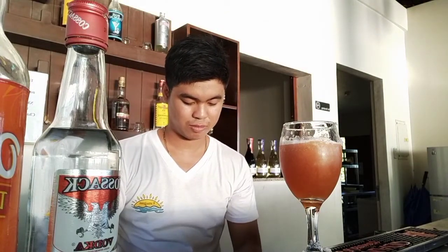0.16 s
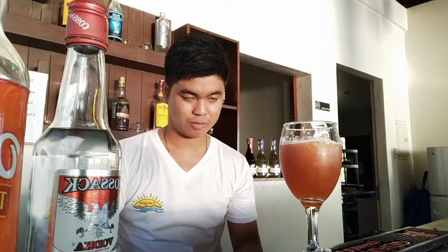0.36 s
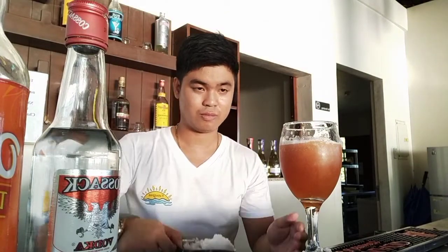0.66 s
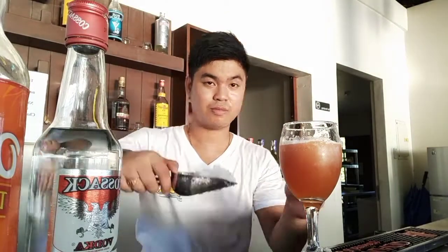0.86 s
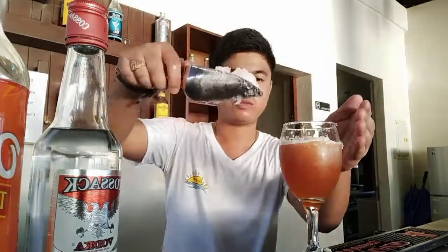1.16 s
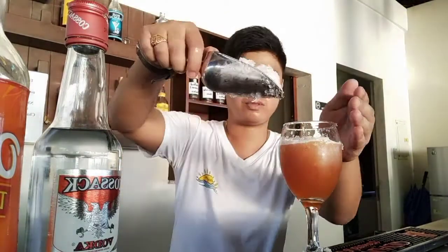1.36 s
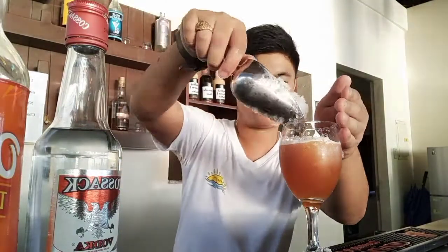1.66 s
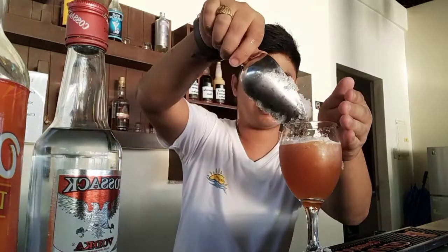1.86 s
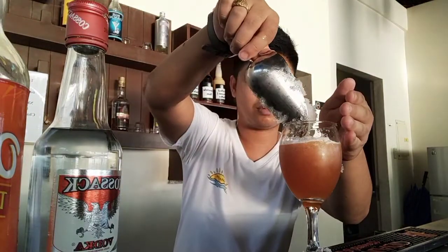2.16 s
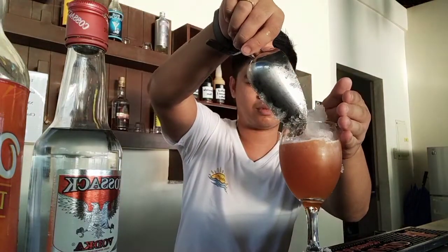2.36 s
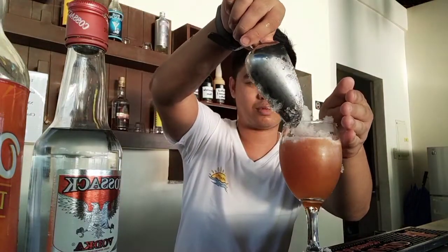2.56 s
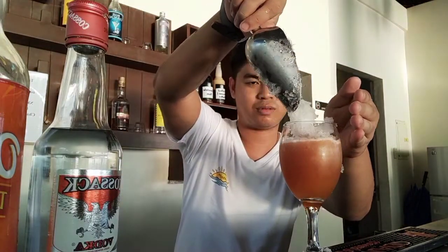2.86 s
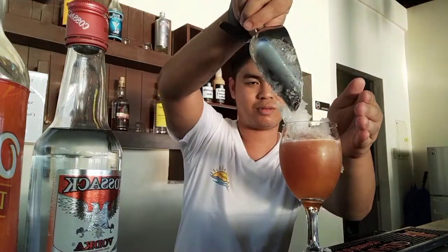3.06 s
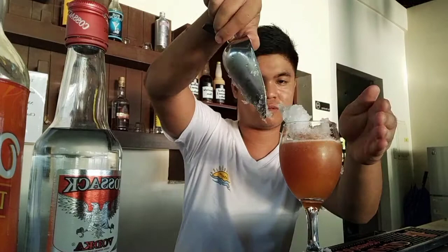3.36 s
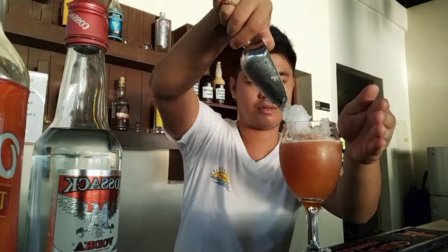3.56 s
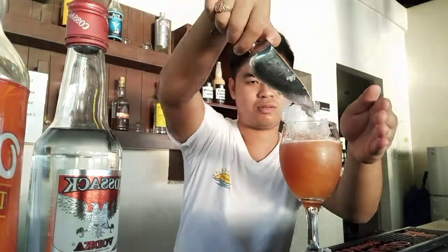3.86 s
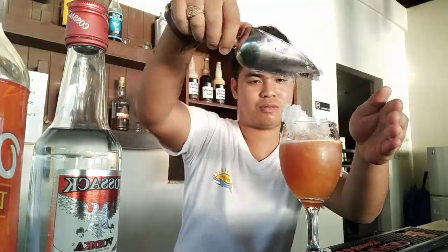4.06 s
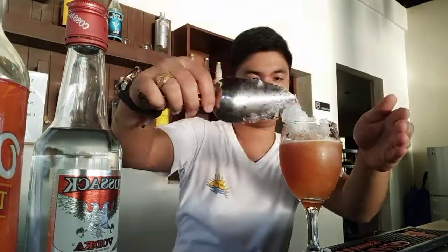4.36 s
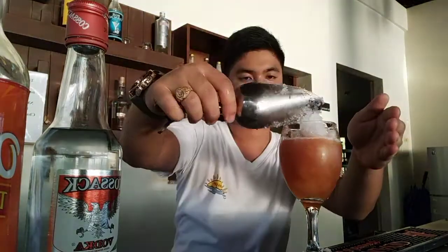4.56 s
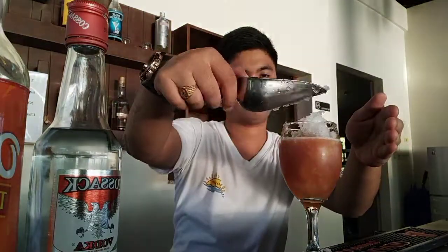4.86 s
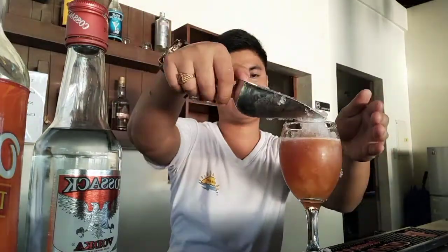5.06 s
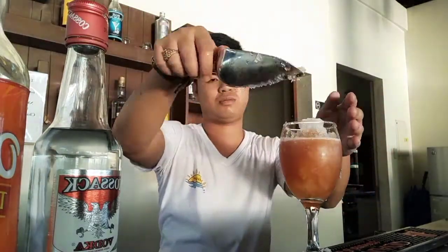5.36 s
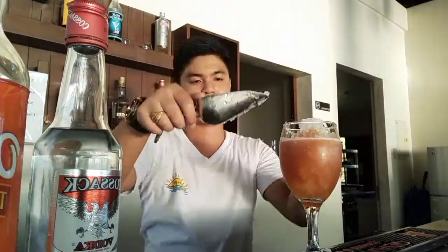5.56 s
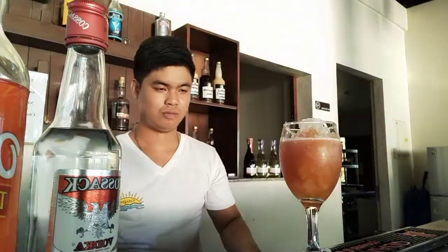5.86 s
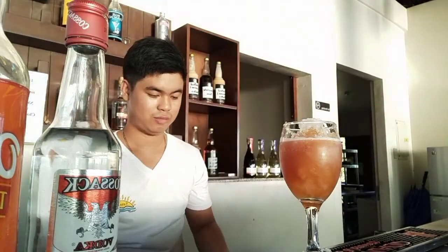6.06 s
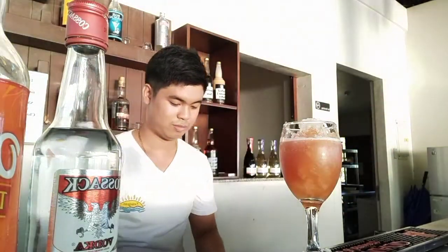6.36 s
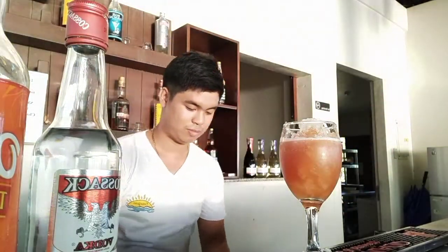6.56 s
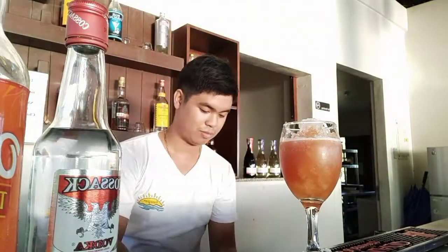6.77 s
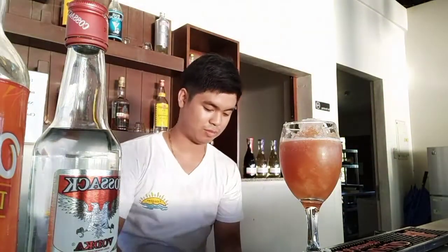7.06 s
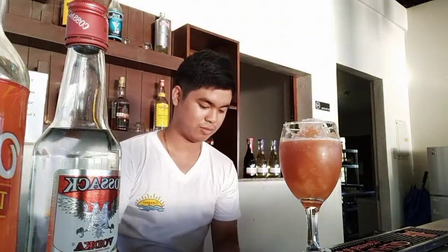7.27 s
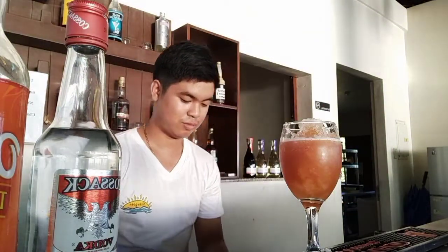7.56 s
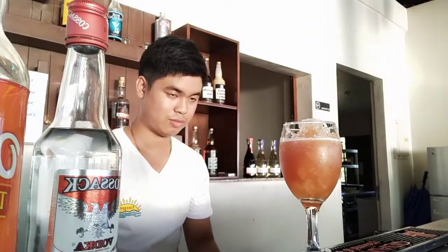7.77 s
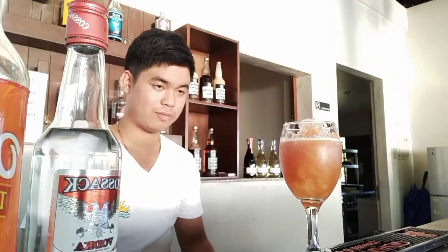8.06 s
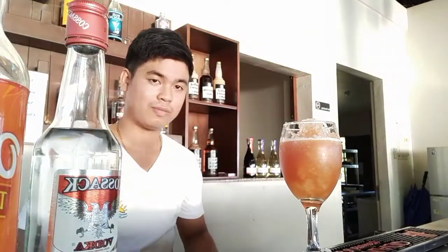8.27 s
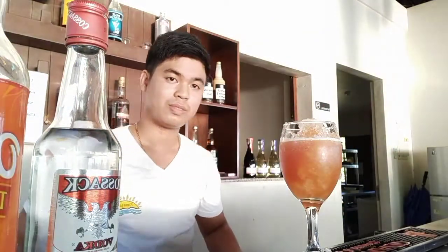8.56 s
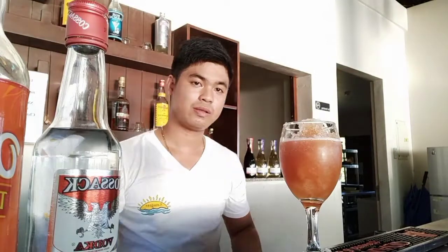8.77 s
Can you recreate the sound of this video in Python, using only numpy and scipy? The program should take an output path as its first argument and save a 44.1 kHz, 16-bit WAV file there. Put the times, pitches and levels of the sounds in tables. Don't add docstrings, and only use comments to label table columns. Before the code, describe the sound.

In a hard, ringing bar room with a low fridge rumble, spaced heavy blows crack ice and ring steel, scattering tiny glassy ticks. After a lull, a metal scoop digs into crushed ice in short gritty crunches with clacking lumps. It ends with a clink on the counter. One microphone sits a few metres away.

```python
import sys
import numpy as np
from scipy import signal
from scipy.io import wavfile
from scipy.ndimage import uniform_filter1d

SR = 44100
rng = np.random.default_rng(int(sys.argv[2]) if len(sys.argv) > 2 else 0)


def convert_level_to_amplitude(level_db):
    exponent = np.asarray(level_db, float) / 20
    return 10 ** exponent


def inscribe(sig):
    pcm = np.round(np.clip(np.atleast_2d(sig).T, -1, 1) * 32767)
    wavfile.write(sys.argv[1], SR, pcm.astype(np.int16))


N = 392490

# frequency in Hz, density in dB per Hz.
RUMBLE_COLOUR = [(15, -14), (25, -9.5), (53, 2), (103, -1.5), (197, -14), (259, -14.5), (524, -19.5),
                 (1180, -19.5), (1930, -23), (2600, -24.5), (5880, -40), (8370, -35), (11300, -42),
                 (15200, -37.5)]
RUMBLE_DB = -50.5
# time in seconds, level in dB.
RUMBLE_SWELL = [(0, -4), (.9, -0.5), (1.5, -1), (1.76, 2.5), (2.03, -1), (2.45, 2), (3.05, -1), (3.7, -0.5),
                (4.2, 2), (4.85, 4), (5.13, -1), (5.8, -3), (6.9, 1), (7.8, -1), (8.9, -3.5)]
WASH_FOLLOWS = 0.77
# frequency in Hz, width in Hz, level in dB.
FRIDGE_HUM = [(53.3, 30, -62.5), (110.6, 25, -62.5), (192, 66, -70.5)]

# frequency in Hz, t60 in seconds.
ROOM_DECAY = [(100, 0.9), (250, 0.48), (500, 0.45), (1000, 0.32), (2700, 0.42), (5000, 0.36),
              (10000, 0.31475), (16000, 0.31)]
# delay after the air path in seconds, level in dB.
REFLECTIONS = [(0, -6), (.0022, -2), (.0042, 0), (.0062, 3), (.0078, 2), (.011, -4), (.0155, -7),
               (.026, -5), (.029, -2)]

# start in seconds, level of the first 40 ms in dB, thud in dB,
# low steel ring in dB, high steel ring in dB.
BLOWS = [
    (.179, -30.5, 2, -6, -28),
    (.813, -26, 1, -11, 3.5),
    (1.611, -26, 3, -13, 5),
    (2.2134, -34, -11, -20, 1),
    (2.2549, -28, 9, -33, -3),
    (3.836, -27, 3.5, -1.5, -1),
    (4.299, -25, 1, 2.5, -28),
    (4.7089, -23.5, -1, 0.5, -21),
]
# frequency in Hz, density in dB per Hz.
CRACK_COLOUR = [(35, -44), (60, -8.5), (546, -8), (742, -6.5), (1110, -2.5), (1270, 1), (2190, -6),
                (2580, -4), (3930, -13), (5100, -16.5), (5600, -24), (8150, -14), (11900, -22),
                (15400, -20), (16500, -21.5)]
# frequency in Hz, level in dB, t60 in seconds.
LOW_RING = [(2530, -31.5, 0.19), (2620, -5, 0.29), (2520, -9, 0.64), (2597, 2.5, 0.52), (2550, 12, 0.49),
            (2743, 26, 0.04), (2860, 17, 0.2064), (2804, 13, 0.17)]
HIGH_RING = [(4942, 0, .34), (5200, -10, .2), (8060, 0, .25), (8300, -6, .22)]
# frequency in Hz, level in dB, t60 in seconds.
BLOCK_KNOCK = [(897, -6, 0.13), (1162, 14, 0.01469), (1540, -9.5, 0.02249)]
# delay in seconds, level in dB.
COUNTER_ARRIVALS = [(.000, -2.5), (.005, -3)]
# frequency in Hz, density in dB per Hz.
COUNTER_COLOUR = [(60, -20.5), (300, -5.5), (800, 1.5), (1600, -8), (4000, -32.0), (9000, -37.5)]
AIR_LAG_S = .0095
CLAP_HZ, CLAP_WIDTH_HZ, CLAP_DB = 1294, 444, -7
SPLASH_DB, FIRM_DB, SPLASH_SLOPE = 1.4, -29.5, 4.5

# start in seconds, peak in dB, pitch in Hz, broad tick in dB.
CHIPS = [(1.1116, -49, 10100, -9), (1.578, -21.5, 6374, 14.5), (1.9054, -38, 16200, -40),
         (2.6254, -51.5, 14400, 3), (2.727, -54, 6300, 4), (2.7786, -52, 6230, 7),
         (2.9135, -47.5, 9050, 12), (2.935, -48.5, 9785, 9), (3.2294, -64, 5310, -6),
         (4.9943, -45, 15000, -1), (7.6894, -59.5, 6950, -3), (8.3882, -60, 13670, -1)]
# frequency in Hz, density in dB per Hz.
CHIP_COLOUR = [(400, -9), (1800, 4), (5500, -5), (8300, -3), (11500, -4), (15000, -6)]

# start in seconds, push in seconds, crunch on entry in dB,
# crunch at the end of the push in dB, hiss of fine ice in dB.
STROKES = [(1.3, 0.029, -50, -54.5, -68), (6.11, 0.0935, -68.5, -65, -69.5),
           (6.339, 0.089, -65.5, -65, -67.5), (6.494, 0.02722, -50, -50.5, -57),
           (6.67, 0.16, -54, -48, -57), (7.003, .06, -46, -40.5, -51.5), (7.082, 0.027, -40, -33, -51),
           (7.3, 0.15, -53.5, -49.5, -56), (7.617, 0.096, -56, -46, -60), (7.861, 0.033, -70, -46, -61),
           (7.89, 0.088, -39, -51, -55), (8.762, .085, -49.5, -65, -64)]
# frequency in Hz, density in dB per Hz.
CRUNCH_COLOUR = [(88, -22), (150, 2), (187, 5.5), (317, -11), (605, -6.5), (660, -8), (1760, -3.5),
                 (2580, -0.5), (5000, -74), (6500, -57), (11000, -120)]
HISS_COLOUR = [(2060, -4), (3500, 4.5), (4470, -0.5), (4950, 0), (6310, 0.5), (6730, -6), (8370, 5),
               (11800, -5), (15000, 5), (16200, 4)]
BITE_S, SETTLE_S = 0.01, .14
CRUNCH_FALL, HISS_FALL = 450, 210
EMPTY_HZ, FULL_HZ = 1030, 1750

# start in seconds, length in seconds, pitch in Hz, glide in Hz, level in dB.
WHISTLES = [
    (2.998, .27, 4800, 1150, -71.5),
    (3.042, .26, 5350, -20, -73.5),
    (5.45, 0.36, 1087, 110, -66),
    (8.293, 0.12985, 3910, -20, -70),
    (8.33, 0.2348, 1097, 48, -66),
]

# start in seconds, peak in dB, low pitch in Hz, high pitch in Hz,
# treble in dB.
KNOCKS = [(5.353, -45.5, 1340, 1730, -31.5), (5.396, -49, 1490, 2280, -24), (5.669, -50.5, 1184, 2300, -16),
          (6.501, -39, 831.3, 2680, -19), (6.671, -43, 1490, 1550, -12), (6.711, -29, 680, 1800, -13),
          (6.799, -39.5, 1440, 2080, -10), (7.006, -33, 1112, 1520, -12), (7.036, -24.5, 790, 2220, -44),
          (7.047, -36, 910, 2039, -20), (7.084, -29.5, 1520, 2670, -17.5), (7.099, -35, 1368, 1830, -22),
          (7.301, -43, 1460, 1590, -7), (7.373, -35.5, 875, 2020, -21), (7.625, -35.5, 1365, 1440, 5),
          (7.649, -31, 900, 1402, -33), (7.678, -30.5, 1160, 1670, -24), (7.698, -38, 1248, 1588, -23),
          (7.895, -21, 720, 2500, -21), (7.909, -41, 625, 2750, -7), (7.96, -31, 1440, 1750, -33)]
THUMP_DB, THUMP_SLOPE = -11.5, 12

# time in seconds, rate in Hz.
SLIP_RATE = [(8.17, 2640), (8.185, 2740), (8.21, 2825), (8.285, 2885), (8.33, 2860), (8.35, 2720)]
# multiple of the slip rate, start in seconds, length in seconds, level in dB.
SLIP_PARTIALS = [(5, 8.172, 0.1655, -66), (4, 8.175, .17, -86), (5.39, 8.2, .082, -69),
                 (5.33, 8.295, 0.0619, -67), (4.69, 8.268, 0.075, -67)]
ARCH_MID_S, ARCH_HALF_S, ARCH_TOP_HZ, ARCH_BEND, ARCH_DB = 8.262, .15, 18000, 225000, -77

# start in seconds, peak in dB, pitch share.
CLINK = [
    (8.613, -22.5, 1),
]
# frequency in Hz, level in dB, t60 in seconds.
SCOOP_MODES = [(662, -9.5, 0.2072), (1210, -27, .12), (1440, -3, .25), (1520, 3.5, 0.11), (1800, -7, 0.057),
               (2660, -5.5, 0.2), (4210, -19, 0.2003), (5197.6, -11, 0.14), (6270, -13, 0.0775),
               (6970, -13, .14), (8560, -11, .2), (8900, -6, 0.16), (9050, -10, 0.06), (10400, -16, .1),
               (11720, -13, .12), (12841, -10, .13), (14600, -9, .17), (14850, -16, .08)]
# start in seconds, peak in dB, pitch share.
NUDGES = [
    (8.767, -40, .92),
    (8.816, -37, 1.0),
]
# frequency in Hz, level in dB, t60 in seconds.
TUB_MODES = [(602, -3.5, 0.51), (856, -2, 0.41), (1467.6, -24, 5.0), (1606, 3, 0.13), (1682, -23.5, 0.14),
             (1965, -7, 0.21), (2350, -25.5, 0.23)]
GRIP_S, GRIP_FALL = 0.075, 600


def evened(x):
    return x / np.sqrt(np.mean(x ** 2) + 1e-20)


def peaked(x, db):
    return convert_level_to_amplitude(db) * x / np.max(abs(x))


def add(mix, s, sound):
    part = mix[round(s * SR):][:len(sound)]
    part += sound[:len(part)]


def read(points, hz):
    f, value = np.transpose(points)
    return np.interp(np.log(hz + 1), np.log(f + 1), value)


def coloured(x, *spectra, size=4096):
    hz = abs(np.fft.fftfreq(size, 1 / SR))
    log_gain = np.log(convert_level_to_amplitude(sum(read(s, hz) for s in spectra)))
    response = np.exp(np.conj(signal.hilbert(log_gain)))
    impulse = np.fft.ifft(response).real[:size // 2]
    return signal.oaconvolve(x, impulse)[:len(x)]


def resonate(x, hz, width_hz):
    turn = np.exp(2j * np.pi * np.cumsum(hz * np.ones(len(x))) / SR)
    r = np.exp(-np.pi * width_hz / SR)
    return 2 * (turn * signal.lfilter([1 - r], [1, -r], x / turn)).real


def ring(modes, longest, size=20000):
    t = np.arange(size) / SR
    split = rng.uniform(0.0012, 0.00676, len(modes))
    out = np.zeros(size)
    for (hz, db, t60), d in zip(modes, split):
        pair = np.sin(2 * np.pi * hz * t) + np.sin(2 * np.pi * hz * (1 + d) * t)
        out += convert_level_to_amplitude(db - 60 * t / min(t60, longest)) * pair
    return out


def crack(t60, size=26000):
    snaps = rng.choice([-1., 1.], size) * convert_level_to_amplitude(3.43 * np.minimum(rng.exponential(1, size), 3))
    return snaps * convert_level_to_amplitude(-60 * np.arange(size) / SR / t60)


def contact(crumble_db, t60, size):
    hit = convert_level_to_amplitude(crumble_db) * crack(t60, size)
    hit[0] = 1
    return hit


def with_room(sound, room_db, space):
    return sound + convert_level_to_amplitude(room_db) * signal.fftconvolve(sound, space)[:len(sound)]


def room(diffuse_db=4, rise=0.0038):
    taps = np.zeros(SR)
    at = np.arange(0, SR - 10, 10)
    taps[at + rng.integers(0, 10, len(at))] = rng.choice([-1., 1.], len(at))
    hz, t, z = signal.stft(taps, SR, nperseg=512)
    decay = convert_level_to_amplitude(-60 * t / read(ROOM_DECAY, hz)[:, None])
    tail = signal.istft(z * decay, SR, nperseg=512)[1][:SR]
    tail *= 1 - np.exp(-np.arange(SR) / SR / rise)
    tail *= convert_level_to_amplitude(diffuse_db) * 2 / np.linalg.norm(tail)
    for s, db in REFLECTIONS:
        scatter = crack(0.0075, size=200)
        add(tail, s, convert_level_to_amplitude(db) * scatter / np.linalg.norm(scatter))
    return tail / np.linalg.norm(tail)


def background():
    frames, hz = N // 512 + 5, np.fft.rfftfreq(2048, 1 / SR)
    a, b, patches = rng.standard_normal((frames, 1025, 3)).T
    patches = evened(uniform_filter1d(uniform_filter1d(patches, 16, 0), 6, 1))
    t = np.arange(frames) * 512 / SR
    low = 1 / (1 + (hz[:, None] / 250) ** 4)
    swell_db = (low + (1 - low) * WASH_FOLLOWS) * np.interp(t, *np.transpose(RUMBLE_SWELL))
    z = (a + 1j * b) * convert_level_to_amplitude(read(RUMBLE_COLOUR, hz)[:, None] + 1.87 * patches + swell_db)
    wash = signal.istft(z, nperseg=2048, noverlap=1536)[1][:N]
    out = convert_level_to_amplitude(RUMBLE_DB - 4.0) * evened(wash)
    for f, width_hz, db in FRIDGE_HUM:
        flutter = evened(resonate(rng.standard_normal(N), 0, width_hz))
        level = resonate(np.sqrt(2) + 0.4 * flutter + 0j, 0, 200) / 2
        drift = evened(resonate(rng.standard_normal(N), 0, 3.98))
        out += convert_level_to_amplitude(db) * level * np.sin(2 * np.pi * np.cumsum(f * (1 + 0.02565 * drift)) / SR)
    return out


def blows(space):
    out = np.zeros(N)
    for s, db, thud_db, low_db, high_db in BLOWS:
        splash_db = SPLASH_DB + SPLASH_SLOPE * min(db - FIRM_DB, 0)
        hit = contact(-31.0, 0.02883, 20000)
        tone = [(70, thud_db - 9), (150, thud_db - 2.5), (300, thud_db - 6), (550, thud_db - 3.5),
                (1000, 0.0089), (3000, 0), (4800, -thud_db / 2), (7000, splash_db / 2),
                (10000, splash_db), (14000, splash_db / 2)]
        ice = evened(coloured(hit, CRACK_COLOUR, tone)) + convert_level_to_amplitude(-14) * evened(ring(BLOCK_KNOCK, 0.21))
        steel = convert_level_to_amplitude(low_db - 10.5) * evened(ring(LOW_RING, 0.8))
        steel += convert_level_to_amplitude(high_db - 21.5) * evened(ring(HIGH_RING, .4))
        heard = signal.fftconvolve(ice + steel, space)
        heard /= np.std(heard[:SR // 25])
        hollow = resonate(hit[:400], CLAP_HZ, CLAP_WIDTH_HZ)
        hollow = resonate(hollow, CLAP_HZ, CLAP_WIDTH_HZ)
        clap = signal.fftconvolve(hollow, space[:420])
        heard[:len(clap)] += convert_level_to_amplitude(CLAP_DB) * evened(clap)
        add(out, s + .0007, convert_level_to_amplitude(db) * heard)
        push = coloured(crack(0.023, size=1500), COUNTER_COLOUR)
        for lag, ahead_db in COUNTER_ARRIVALS:
            push_db = db + ahead_db + 0.94 * min(thud_db, 0)
            add(out, s + 0.00063 - AIR_LAG_S + lag, peaked(push, push_db))
    return out


def chips(space):
    out = np.zeros(N)
    for s, db, hz, tick_db in CHIPS:
        snap = crack(0.014, size=6000)
        chip = evened(resonate(snap, hz, 250)) + convert_level_to_amplitude(tick_db) * evened(coloured(snap, CHIP_COLOUR))
        add(out, s, peaked(with_room(chip, -9.0, space), db))
    return out


def strokes(space):
    out = np.zeros(N)
    for start, push, entry_db, end_db, hiss_db in STROKES:
        t = np.arange(0, push + SETTLE_S, 1 / SR)
        done, after, bite = np.minimum(t / push, 1), np.maximum(t - push, 0), np.minimum(t / BITE_S, 1)
        grains = rng.standard_normal((2, len(t)))
        big, fine = grains * convert_level_to_amplitude(4.7 * np.minimum(rng.exponential(1, (2, len(t))), 3.5))
        big *= rng.random(len(t)) < 6000 / SR
        hollow = resonate(big, EMPTY_HZ + (FULL_HZ - EMPTY_HZ) * done ** 2, 210)
        crunch = evened(evened(coloured(big, CRUNCH_COLOUR)) + convert_level_to_amplitude(-9.5) * evened(hollow))
        crunch *= convert_level_to_amplitude(entry_db + (end_db - entry_db) * done - CRUNCH_FALL * after - 4.5)
        waver = evened(uniform_filter1d(rng.standard_normal(len(t)), size=500))
        hiss = evened(coloured(fine, HISS_COLOUR)) * convert_level_to_amplitude(hiss_db - HISS_FALL * after + 1.8 * waver)
        add(out, start, (crunch + hiss) * bite)
    return with_room(out, -11, space)


def whistles():
    out = np.zeros(N)
    for start, length, hz, glide_hz, db in WHISTLES:
        u = np.arange(0, length, 1 / SR) / length
        air = rng.standard_normal(len(u))
        for _ in range(2):
            air = resonate(air, hz + glide_hz * np.sin(1.9 * u), .025 * hz + .6 * abs(glide_hz))
        add(out, start, evened(air) * convert_level_to_amplitude(db - 8.7 * u) * signal.windows.tukey(len(u), .3))
    return out


def knocks(space):
    out = np.zeros(N)
    for s, db, low_hz, high_hz, treble_db in KNOCKS:
        thump_db = THUMP_DB - THUMP_SLOPE * np.log2(low_hz / 1000)
        tone = [(60, thump_db - 12.5), (200, thump_db), (500, 1.25), (3200, -1.2),
                (5500, treble_db - 37), (8300, treble_db), (15000, treble_db - 3)]
        hit = contact(-25, 0.06, 4000)
        clack = evened(resonate(hit, low_hz, 115))
        clack += convert_level_to_amplitude(-4.5) * evened(resonate(hit, high_hz, 94.3))
        clack += convert_level_to_amplitude(thump_db - 10) * evened(resonate(hit, 342, 130))
        lump = np.pad(evened(coloured(hit, tone)) + convert_level_to_amplitude(6) * clack, (0, 16000))
        add(out, s, peaked(with_room(lump, -3, space), db))
    return out


def slip(hz, db):
    waver, catch = (evened(uniform_filter1d(rng.standard_normal(len(hz)), size=k)) for k in (150, 600))
    tone = np.sqrt(2) * np.sin(2 * np.pi * np.cumsum(hz * (1 + .003 * waver)) / SR)
    return tone * convert_level_to_amplitude(db + 3.47 * catch) * signal.windows.tukey(len(hz), .25)


def squeaks():
    out = np.zeros(N)
    for multiple, start, length, db in SLIP_PARTIALS:
        rate = np.interp(start + np.arange(0, length, 1 / SR), *np.transpose(SLIP_RATE))
        add(out, start, slip(multiple * rate, db))
    t = np.arange(-ARCH_HALF_S, ARCH_HALF_S, 1 / SR)
    add(out, ARCH_MID_S - ARCH_HALF_S, slip(ARCH_TOP_HZ - ARCH_BEND * t ** 2, ARCH_DB))
    return out


def set_down(space, events, modes, snap_db, treble_db, chatter_db, longest):
    out = np.zeros(N)
    for s, db, share in events:
        hit = contact(chatter_db, 0.19, 4000)
        body = evened(signal.fftconvolve(hit, ring(np.multiply(modes, [share, 1, 1]), longest)))
        body *= convert_level_to_amplitude(-GRIP_FALL * np.maximum(np.arange(len(body)) / SR - GRIP_S, 0))
        tone = [(300, -0.5), (900, 12), (2800, -1), (4500, treble_db)]
        body[:len(hit)] += convert_level_to_amplitude(snap_db) * evened(coloured(hit, CRACK_COLOUR, tone))
        add(out, s, peaked(with_room(body, -4, space), db))
    return out


def scene():
    space = room()
    mix = background() + blows(space) + chips(space) + strokes(space)
    mix += whistles() + knocks(space) + squeaks()
    mix += set_down(space, CLINK, SCOOP_MODES, snap_db=4, treble_db=8, chatter_db=-27, longest=.19)
    mix += set_down(space, NUDGES, TUB_MODES, snap_db=0, treble_db=-18, chatter_db=-12, longest=.12)
    return mix[None]


def band_limit(x):
    return signal.sosfilt(signal.butter(12, 16990, fs=SR, output="sos"), x)


def record(dry):
    edge = signal.firwin(511, 15850, window=("kaiser", 4), fs=SR)
    return band_limit(signal.oaconvolve(dry, edge[None], "same") + convert_level_to_amplitude(-33) * dry)


dry = scene()
out = record(dry)
inscribe(out)
```